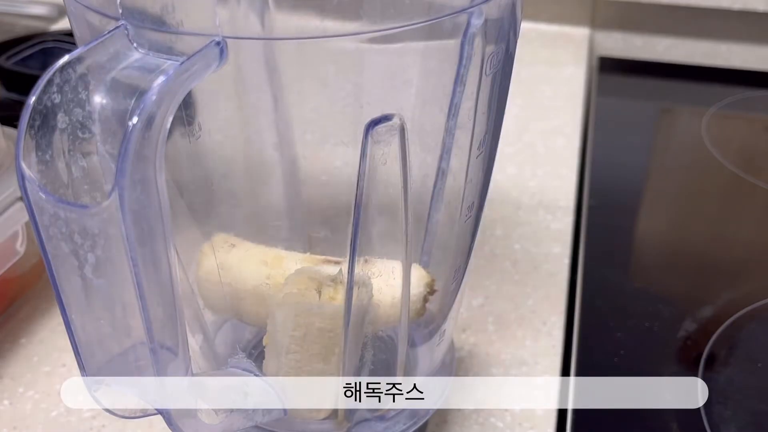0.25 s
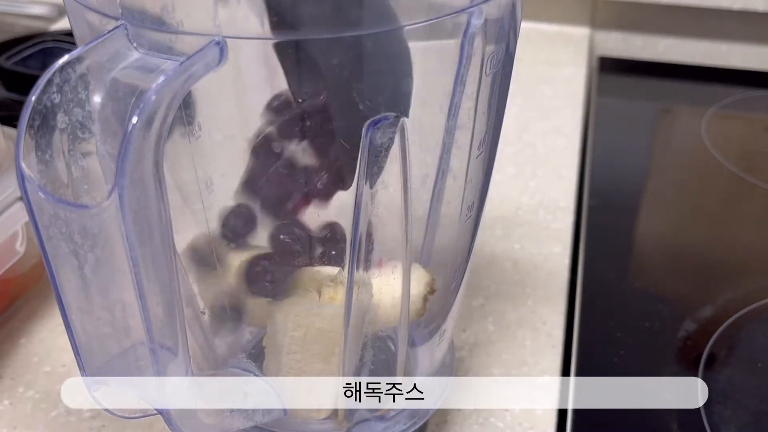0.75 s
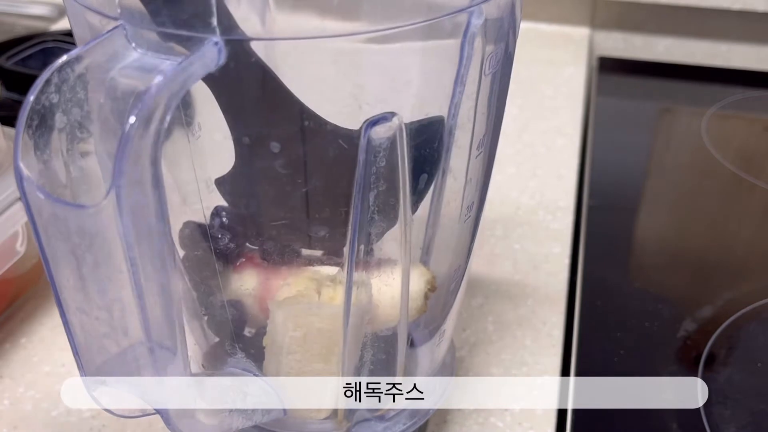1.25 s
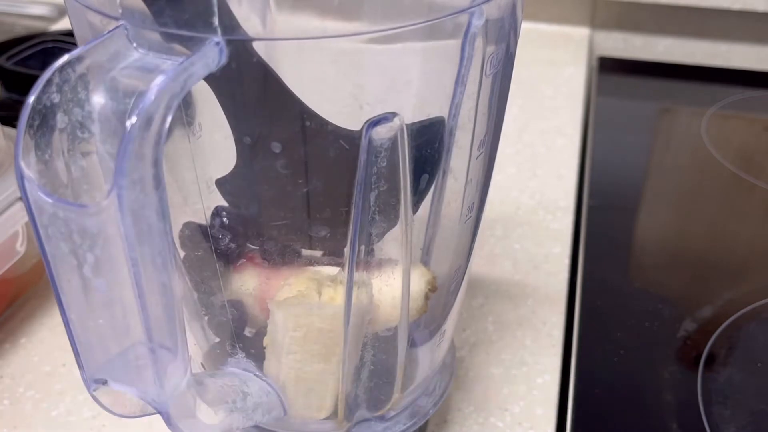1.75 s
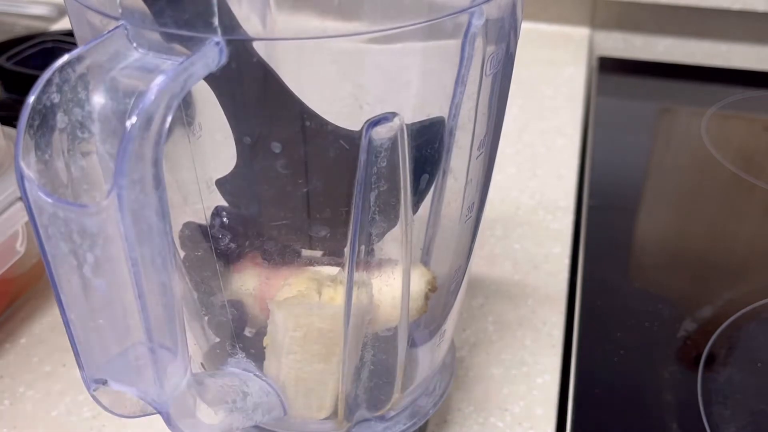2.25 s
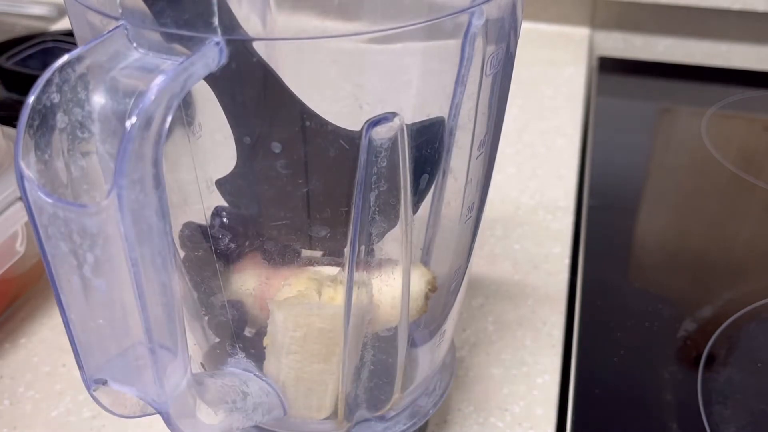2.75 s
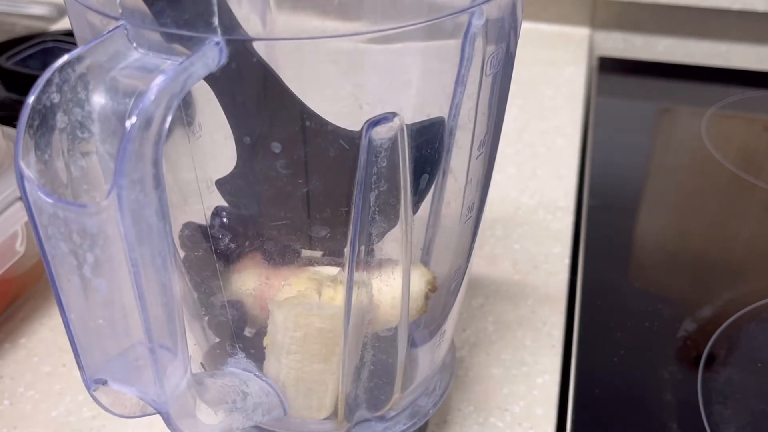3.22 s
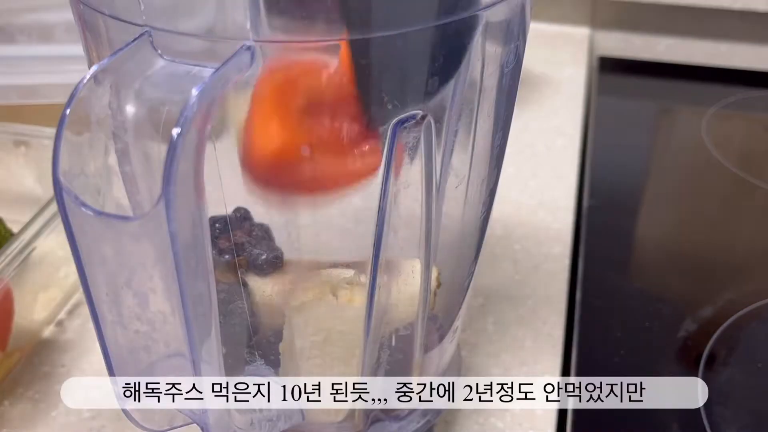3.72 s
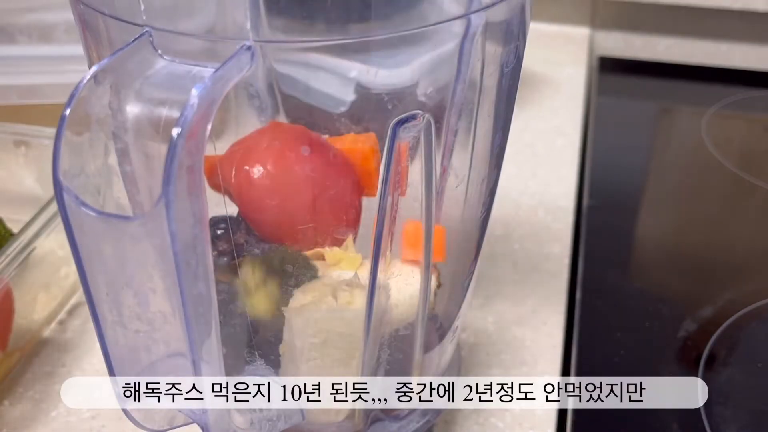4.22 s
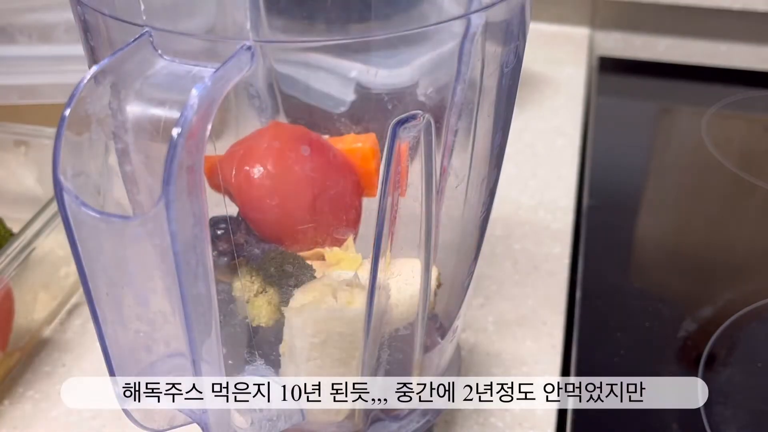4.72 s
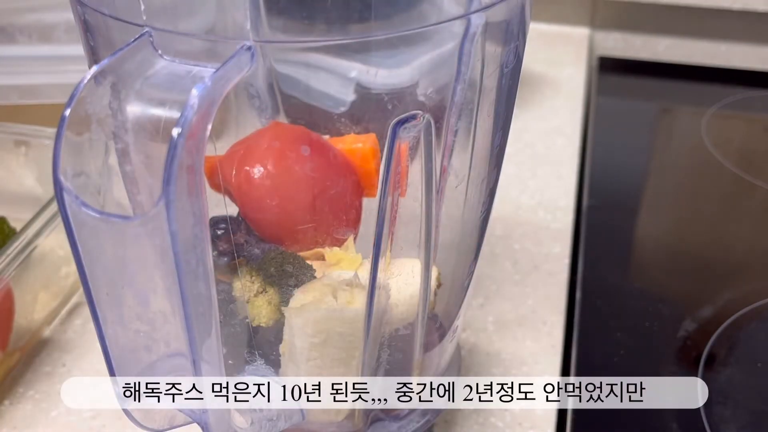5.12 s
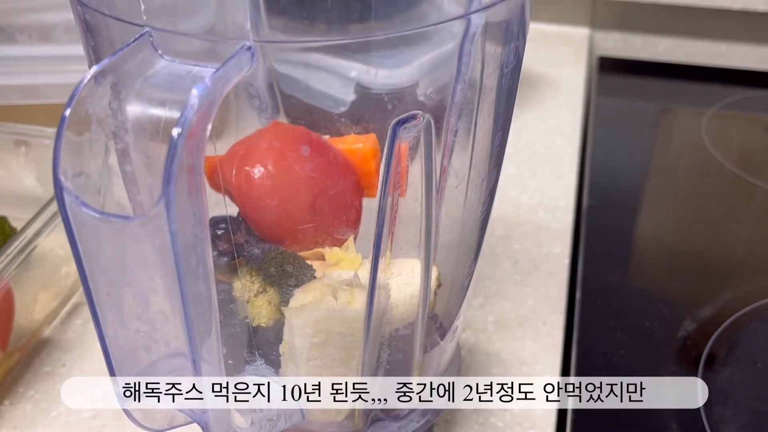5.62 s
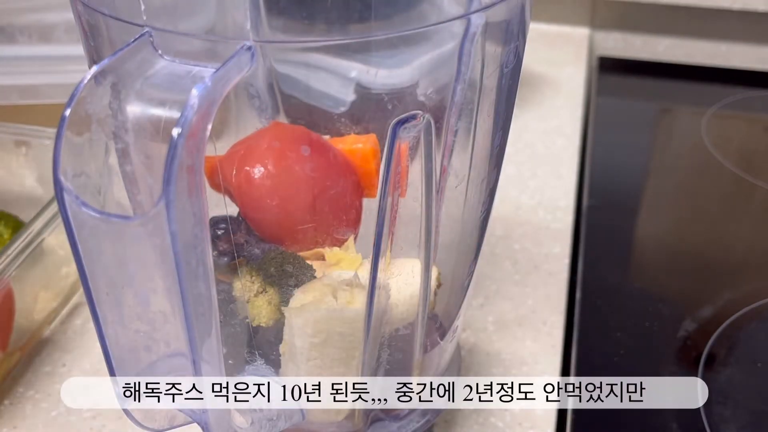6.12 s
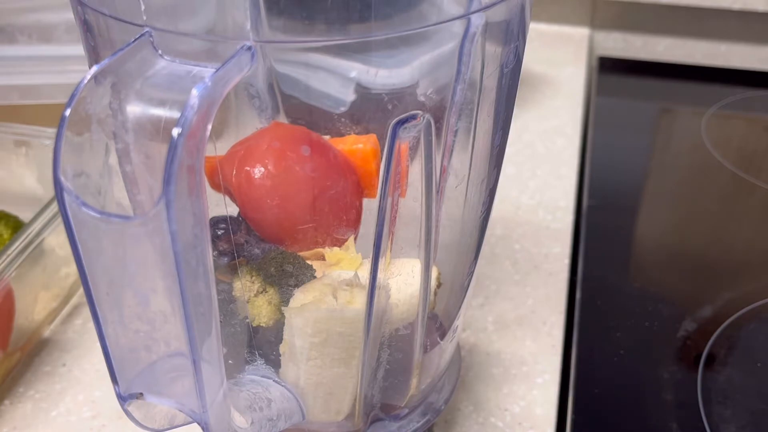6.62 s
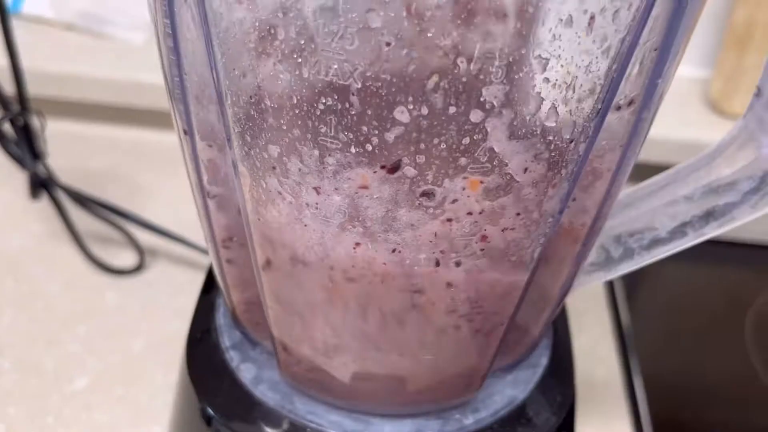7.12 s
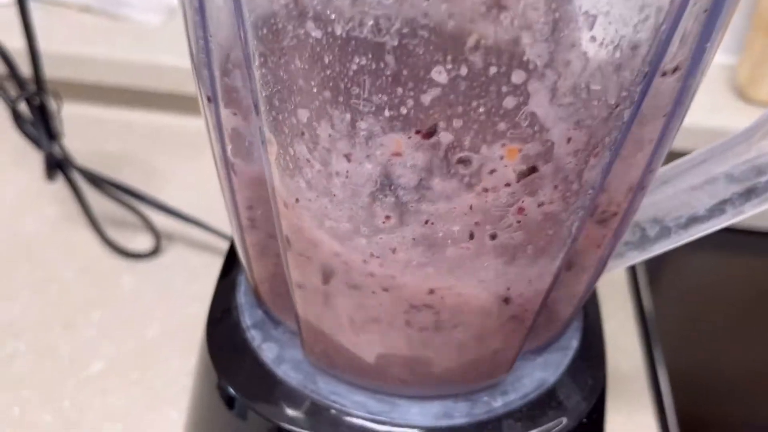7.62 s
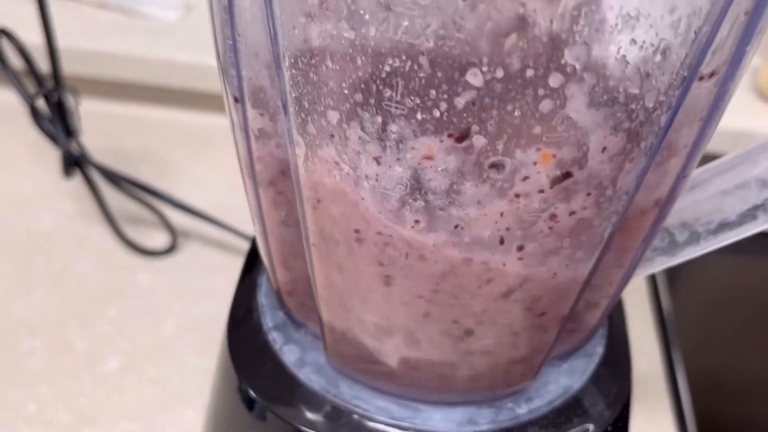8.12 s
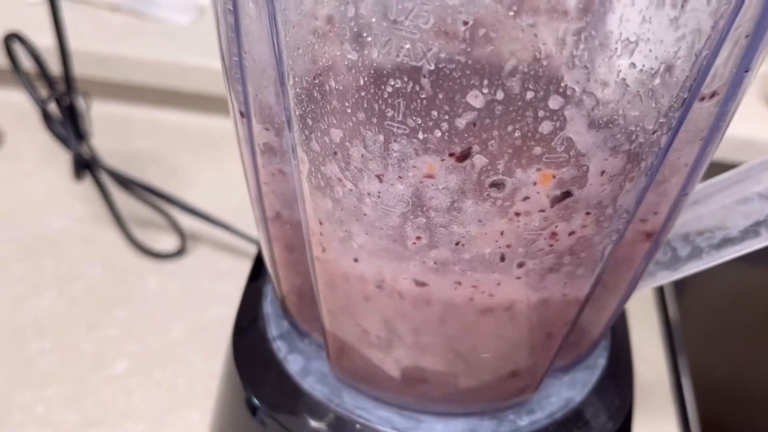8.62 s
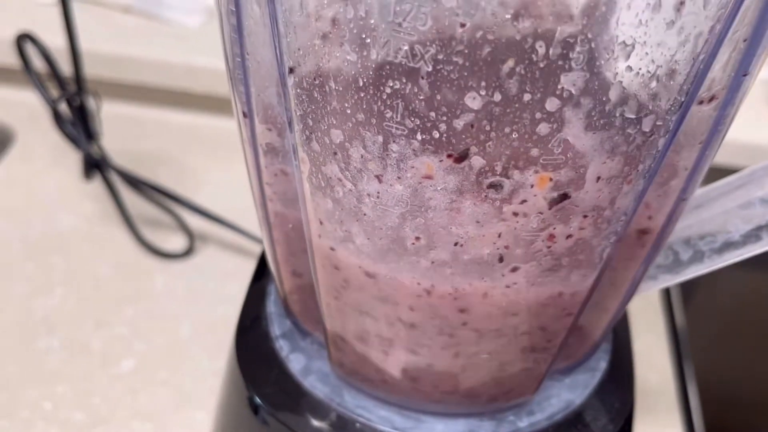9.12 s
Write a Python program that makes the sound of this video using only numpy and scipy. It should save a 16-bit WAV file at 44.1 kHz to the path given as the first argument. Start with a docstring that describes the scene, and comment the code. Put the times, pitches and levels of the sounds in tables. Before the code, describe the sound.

A low appliance hum runs under a close, slightly echoing kitchen scene. At about 0.6 seconds berries patter softly into a plastic blender jar, and just after 1 second a ladle clatters against its wall, followed by tiny drips. A dish clinks lightly near 1.9 seconds. A plastic tub knocks on the counter from 2.1 seconds, with a few wet plops, and its lid snaps sharply at 2.7. The jar rocks lightly around 3.2 seconds, and wet vegetables slide in from 3.6 to 4. Faint rubbing, drips and dull, more distant utensil taps fill the quiet stretch that follows. At 7.1 seconds a blender cuts in abruptly at full speed, far louder than everything else. Its motor drones with a wavering pitch while the blades churn pulp and air pockets glug. It squeals briefly near 8.7 seconds and is still running at the end, around 9.4 seconds.

```python
"""Making a smoothie

Berries tumble into a plastic blender jar and a ladle clatters in after them, ringing its wall.
A tub is set down, its lid snaps, wet vegetables slide in, juice drips and utensils tap.
Then the scene jumps to the blender at full speed: the motor sings, the blades churn the pulp
and air pockets glug. An appliance hums throughout. It is all heard through the two microphone
ports of a phone standing close by."""
import sys
import numpy as np
from scipy import signal
from scipy.fft import rfft, irfft, next_fast_len
from scipy.io import wavfile
from scipy.ndimage import uniform_filter1d, map_coordinates

SR = 44100
rng = np.random.default_rng(int(sys.argv[2]) if len(sys.argv) > 2 else 0)


def waveform_to_disk(signal):
    """Save audio, clipped to [-1, 1], as 16-bit WAV at the path in sys.argv[1]."""
    frames = np.transpose(np.atleast_2d(signal))
    scaled = np.clip(frames, -1, 1) * 32767
    samples = np.round(scaled).astype(np.int16)
    wavfile.write(sys.argv[1], SR, samples)


N = 412776

# The motor shaft. Each row: time in seconds, turns per second, level of its tones in dB.
SHAFT = [(7.4, 115.8, -32), (7.56, 119.6, -29), (7.84, 120.2, -35), (8.04, 116, -33), (8.5, 119.3, -36.5),
         (8.75, 122, -34), (8.95, 120, -32.5), (9.3, 119.3, -35.5)]
# The motor and blade tones. Each row: multiple of the shaft speed, relative level in dB.
SHAFT_TONES = [(2, -10), (3, -12), (4, -8), (5, -4), (6, -4), (7, -6), (8, -5), (9, -5), (10, -9),
               (18, -10), (23, -11), (38, -11)]
# The load on the blades. Each row: time in seconds, then relative dB of churning, gulping and spray.
BLADE_LOAD = [(7.14, -27, -34.5, -38), (7.24, -25, -29, -38.5), (7.34, -28.5, -33.5, -44),
              (7.38, -26.5, -33, -36.5), (7.47, -26, -29.5, -44.5), (7.56, -27, -35.5, -43.5),
              (7.63, -26, -27.5, -42.5), (7.68, -27, -30.5, -47), (7.87, -25.5, -29, -41.5),
              (7.95, -28.5, -35, -44), (7.97, -25.5, -36, -39), (8.02, -24.5, -28.5, -42.5),
              (8.09, -28.5, -34.5, -41.5), (8.13, -25.5, -33, -37), (8.23, -26.5, -28.5, -45),
              (8.28, -30, -35, -49.5), (8.3, -26, -28, -47.5), (8.35, -26.5, -31.5, -44.5),
              (8.47, -26, -32, -45.5), (8.51, -30.5, -36, -43.5), (8.59, -25.5, -27.5, -46.5),
              (8.67, -30.5, -34.5, -50), (8.73, -25, -35.5, -36), (8.79, -26.5, -24.5, -46),
              (8.83, -28, -22, -42.5), (8.86, -29.5, -36, -48.5), (8.91, -25.5, -29.5, -38),
              (8.97, -27, -24, -48), (9.02, -27.5, -38, -40.5), (9.04, -25.5, -31, -48),
              (9.16, -26, -27.5, -46), (9.28, -26, -31, -44.5), (9.31, -26.5, -35, -42),
              (9.34, -28, -32, -40.5)]
# The pitches of the housing's four strongest hums, in Hz.
DRONE_HZ = [237, 465, 718, 1258]
# How those hums come and go. Each row: time in seconds, then the relative dB of each hum.
DRONE_LEVELS = [(7.14, -36, -39, -39, -32), (7.35, -36.5, -30, -38, -34.5), (7.55, -38.5, -37, -38, -31.5),
                (7.8, -36, -45, -26, -32.5), (8.03, -35.5, -27, -34, -29), (8.17, -37, -44, -27.5, -28.5),
                (8.4, -39, -30, -48, -35), (8.7, -40, -46, -34, -35.5), (8.95, -35, -57, -33, -31),
                (9.17, -40.5, -26.5, -29, -32.5), (9.33, -40, -63, -35, -32.5)]
# A squealing bearing. Each row: time in seconds, pitch in Hz, level in dB.
SQUEAL = [(8.64, 3030, -58), (8.68, 3000, -25.5), (8.73, 3140, -31), (8.77, 3020, -70)]
# Air pockets collapsing in wet fruit and pulp. Each row: start in seconds, level in dB, pitch in Hz,
# fade time in seconds. A fade time (t60) is how long a sound takes to drop by 60 dB.
GLUGS = [(0.669, -39.5, 1900, 0.053), (0.721, -40.5, 1900, 0.063), (0.787, -46, 1940, 0.11),
         (0.801, -47, 1890, 0.068), (1.709, -51, 2070, 0.054), (1.728, -45.5, 2180, 0.082),
         (1.735, -49, 1900, 0.07), (1.785, -57, 2180, 0.11), (2.252, -25.5, 830, 0.033),
         (2.296, -33.5, 966, 0.057), (2.413, -29, 868, 0.043), (3.74, -43, 2090, 0.023),
         (3.752, -42, 2650, 0.023), (3.822, -55, 4900, 0.014), (3.87, -46, 4600, 0.019),
         (3.871, -44, 1090, .035), (3.881, -45, 4670, 0.015), (3.94, -49, 706, 0.044),
         (4.006, -44, 600, 0.076), (4.427, -50.5, 3200, 0.024), (4.428, -52, 1950, 0.078),
         (7.211, -24.5, 806, 0.1), (7.265, -25, 223, 0.24), (7.41, -23, 457, 0.15),
         (7.478, -28, 380, 0.061), (7.64, -30, 467, .09), (7.767, -17, 322, 0.066),
         (7.841, -20.5, 764, 0.067), (8.006, -18.5, 458, 0.22), (8.21, -19.5, 438, .08),
         (8.238, -20, 353, 0.062), (8.25, -20, 227, 0.083), (8.295, -21, 404, 0.085),
         (8.404, -13.5, 785, 0.051), (8.46, -21.5, 460, 0.11), (8.581, -23.5, 342, 0.11),
         (8.73, -24, 520, 0.16), (8.789, -17, 238, 0.11), (8.88, -26, 191, 0.084), (8.89, -20, 547, 0.1),
         (8.969, -17, 209, 0.075), (8.99, -19, 344, 0.044), (9.1, -24, 413, 0.18), (9.22, -21, 430, 0.074)]

# Hits. Each row: start in seconds, sharp strike in dB, low knock in dB, contact fade time in seconds.
LADLE_HITS = [(1.062, -39, -49, 0.026), (1.086, -34.5, -34.5, 0.048), (1.115, -24, -34, 0.047),
              (1.126, -33, -41, .04), (1.139, -27.5, -43, 0.025), (1.147, -27.5, -30.5, 0.049),
              (1.162, -37.5, -38, .04), (1.173, -30, -30.5, 0.04), (1.19, -41.5, -38, .05),
              (1.217, -45, -35, 0.058)]  # the ladle clatters to rest in the jar
DISH_HITS = [(1.902, -34, -44.5, 0.061)]  # a dish is nudged
TUB_HITS = [(2.061, -28.5, -47.5, 0.079), (2.081, -27, -33, 0.054), (2.095, -45.5, -23.5, 0.032),
            (2.131, -26.5, -42, 0.054), (2.142, -22.5, -13.5, 0.05), (2.25, -50, -44.5, 0.053),
            (2.298, -57.5, -45.5, 0.068), (2.413, -46.5, -43, 0.06), (2.44, -51.5, -50.5, .05),
            (2.467, -48, -43.5, 0.069), (2.544, -37.5, -29, 0.039), (2.562, -35, -26.5, 0.07),
            (2.602, -44, -40, 0.056), (2.647, -42, -39, 0.17)]  # the tub knocks on the counter
LID_HITS = [(2.689, -18, -30, 0.015)]  # its lid snaps
JAR_HITS = [(3.095, -38.5, -29.5, 0.022), (3.206, -39, -33, .03), (3.228, -49, -39, .04),
            (3.265, -55.5, -38.5, 0.05), (3.291, -56, -40, .04), (3.312, -62, -50, .04),
            (3.334, -65, -45, 0.036), (3.379, -56, -62, .008)]  # the jar rocks on its base
# Lighter hits. Each row: start in seconds, sharp strike in dB, low knock in dB.
BERRY_HITS = [(0.612, -55.5, -48.5), (0.664, -57.5, -46.5), (0.721, -53.5, -54), (0.74, -53, -45.5),
              (0.764, -61.5, -51.5), (0.803, -53.5, -40.5), (0.827, -60.5, -48), (0.934, -58, -48),
              (3.869, -64.5, -52.5)]  # berries and vegetable pieces land in the jar
BOARD_TAPS = [(4.751, -58, -44.5), (5.127, -46, -40), (5.301, -85.5, -52.5), (5.463, -48.5, -41),
              (5.5, -52, -43), (6.799, -69, -68.5), (6.864, -62.5, -49.5), (7.013, -60.5, -46)]  # utensils tap farther off
# Food and fingers sliding on plastic. Each row: start, rise time and fade time in seconds,
# then rub and hiss levels in dB.
SLIDES = [(0.525, 0.022, 0.086, -71, -58.5), (0.62, 0.14, 0.44, -63.5, -66), (1.671, 0.039, 1, -64.5, -60),
          (3.61, 0.051, 0.64, -43, -61.5), (3.735, 0.025, 0.1, -56.5, -61), (3.85, 0.02, 0.82, -74, -63.5),
          (4.22, 0.0151, .7, -79, -70), (5.03, 0.0397, 0.34, -80.5, -64), (5.32, .06, .4, -74, -67.5),
          (5.65, 0.07, .6, -73, -74.5), (6.17, 0.028, 0.36, -77, -66), (6.265, .02, 0.35, -74, -69),
          (6.49, 0.0298, 0.24, -79, -65.5), (6.75, 0.0305, 0.29, -70, -70.5)]
# Juice dripping from the ladle. Each row: start in seconds, level in dB.
DRIPS = [(1.268, -58), (1.339, -58.5), (1.396, -60), (1.438, -62.5), (3.87, -69.5), (4.426, -57.5),
         (5.812, -71), (6.797, -69)]

# Modes are the notes a thing rings at. Each row: pitch in Hz, width in Hz, relative level in dB.
# A narrower mode rings for longer.
HOUSING_MODES = [(236, 16, -2), (464, 16, -1), (718, 14, 0), (1225, 25, 2), (1262, 30, 3), (1305, 25, 1),
                 (1450, 14, 5), (1755, 14, 6), (1900, 60, 2), (2160, 25, 4), (2720, 120, -3), (3278, 30, 1),
                 (4470, 120, 4.5), (5680, 250, 3)]
JAR_WALL_MODES = [(1050, 70, -7), (1420, 51, -5), (1920, 36, 3), (1965, 64, 7.5), (2110, 38, 3.5),
                  (2566, 200, -5), (3000, 43, -2), (3470, 65, -3), (4120, 85, -8), (5130, 220, -5)]
JAR_BODY_MODES = [(163.3, 58, 7), (239.5, 19.3, -10.5), (437, 42, 4.5), (591, 95, 1)]
BASE_MODES = [(174, 30, -6.5), (205, 27.3, -1.5), (259, 29, -14.5), (319.6, 70, 2), (420, 49, -5.5),
              (530, 51, -4)]
PLASTIC_MODES = [(675, 51, -16), (1128, 16, -5), (1726, 35, -2), (1996, 30, -2), (2076, 20, 7),
                 (2195, 30, -1), (2406, 45, -3), (2700, 45, -1), (3328, 45, 5), (3531, 60, -1),
                 (4250, 60, -4), (4645, 90, 0), (5440, 90, -4)]  # for the tub and the rocking jar
TUB_BODY_MODES = [(192, 38, -13), (330, 52, -3), (370, 36, 0), (425, 38, -5), (547, 30, -20)]
LID_MODES = [(1195, 14, 9), (1355, 50, -0.5), (1850, 40, 1.5), (2060, 50, 6), (2530, 63, 7.5),
             (2710, 37, 8.5), (3250, 26, -3.5), (4220, 90, 5.5), (4500, 90, 4), (5060, 60, -1),
             (6433, 80, -2)]
DISH_MODES = [(654, 19, 14.5), (1155, 13, 4.5), (1467, 16, 5), (1740, 12, -3), (2004, 14, -2),
              (2300, 90, -4.5), (3540, 40, -11), (4790, 30, -9.5), (5590, 30.2, -17.5)]
COUNTER_MODES = [(208, 50, -7.5), (323, 70, -8), (358, 130, 1), (426.6, 150, -3.5), (534, 40, -15),
                 (915, 130, -7)]
BOARD_MODES = [(351, 55, 0.5), (563, 82, -4), (854, 280, -12.5), (1634, 130, -9.5), (2250, 110, -29)]
WHISTLE_MODES = [(2852, 45, 2), (6630, 140, -2.5)]

# The tone colour of each noise, from bass to treble. Each row: frequency in Hz, relative level in dB.
CHURN_COLOUR = [(450, -2.5), (660, -1), (800, 0), (1100, -3), (1500, -1), (2000, -7.5), (2900, -4),
                (3800, -9), (5600, -13.5), (7000, -16.5), (8500, -22.5), (11000, -23.5), (13000, -34.5),
                (15500, -33)]
CHURN_HOLLOWS = [(600, 0), (665, -6), (720, 0), (1280, 0), (1355, -5), (1420, 0), (1980, 1), (2050, -3),
                 (2140, 1), (2230, -3), (2320, 1), (2470, -2), (2600, 0), (3300, 0), (3450, -3), (3950, 1),
                 (4170, -4), (4450, 1), (4750, 1), (4930, -5), (5260, 1), (5400, -2.5), (5650, 1),
                 (5980, -2), (6280, 2), (6500, -1)]  # narrow dips and peaks that make the churning sound hollow
GULP_COLOUR = [(40, -36), (100, -10.5), (160, -11), (210, -2.5), (285, -17), (360, -2), (450, -5.5),
               (650, -12.5), (1500, -51.5)]
JAR_CRACK = [(800, -4.5), (1050, -5.5), (1500, -5.5), (2050, 1), (2800, -6.5), (4500, -9), (6500, -20.5),
             (8500, -14), (11000, -27.5), (15000, -48.5)]
HARD_CRACK = [(800, 3), (1200, 2), (1700, 10), (2200, 1.5), (3300, -5.5), (4700, -11), (6500, -10),
              (8500, -6), (11000, -17), (15000, -34.5)]  # for the tub, the dish and the rocking jar
LID_CRACK = [(800, -8), (1200, 1.5), (1700, -0.5), (2650, 2.5), (3600, -12), (4300, -3.5), (6000, -9),
             (8500, -6), (11000, -6.5), (15000, -21.5)]
TAP_CRACK = [(500, -17), (1000, 3), (1700, -6), (2300, 0), (3200, -10), (4500, -14), (7000, -53),
             (15000, -48.5)]
RUB_COLOUR = [(300, -4), (600, -2), (1300, -2), (2200, -5), (3000, -7), (4000, -15), (8000, -32)]
HISS_COLOUR = [(1500, -36), (3300, -8), (4600, -3.5), (6500, -2.5), (11000, -5.5), (15000, -21)]
DRIP_COLOUR = [(1000, -16.5), (2000, -8.5), (3000, 3.5), (3800, -8), (4700, -10), (7000, -23.5),
               (15000, -27.5)]
AIR_COLOUR = [(20, -14.5), (35, -3.5), (60, 9.5), (130, -10.5), (220, -1.5), (350, -15), (700, -16),
              (1500, -26), (2500, -39.5), (4500, -46.5), (8000, -41.5), (11000, -39.5), (15500, -36.5)]

# The appliance's hum before the blender comes in. Each row: pitch in Hz, level in dB.
HUM_TONES = [(90.9, -46), (179.8, -49.5), (120, -61.5), (307, -65)]
# The kitchen's echo. Each row: frequency in Hz, fade time in seconds.
ECHO_FADE = [(100, .4), (400, 0.72), (1500, 0.56), (4500, 0.38), (12000, 0.31)]
# How alike left and right are. Each row: frequency in Hz, likeness (1 means the same).
STEREO_LIKENESS = [(200, 0.97), (400, 0.56), (900, 0.078), (1600, 0.42), (2200, 0.99), (4000, 1), (7000, 1),
                   (14000, 1)]
# Timing between the microphone ports. Each row: frequency in Hz, the left one's lead in cycles.
PORT_LEAD = [(1320, 0), (1570, -.5), (1780, -1), (5100, -1), (6600, -1.13), (8000, -1.47), (8900, -1.52),
             (11200, -2), (13000, -2), (14700, -2.47), (16000, -2.5)]
# Balance between the ports. Each row: frequency in Hz, left level minus right level in dB.
PORT_BALANCE = [(100, 0), (330, 3), (560, 1), (800, 3.5), (1250, 0), (1650, -7), (2500, 1.5), (3500, 0.5)]

BLENDER_START_S = 7.12
FIRM_DB, FIRM_CORNER_HZ = -25, 26000  # a firm hit's level, and where its treble falls off
RING_GROWTH, TICK_GROWTH, THUD_GROWTH = 1.96, 1, 0.15  # dB gained for each dB of a harder hit
CEILING, TOP_HZ = 0.85, 15900  # where peaks are rounded off; the highest frequency let through


def blender():
    """The motor sings while the blades chop pulp, shake the housing, gulp air and fling spray."""
    speed, tones_db = curves(SHAFT)
    churn_db, gulp_db, spray_db = curves(BLADE_LOAD)
    slosh = wobble(30)  # the pulp lurches at random
    # lumps make the shaft's speed unsteady
    angle = 2 * np.pi * np.cumsum(speed * (1 + 0.009 * wobble(35))) / SR
    tones = amp(tones_db) * shaft_tones(angle)
    blade_pulse = 1 + 0.088 * np.cos(2 * angle) + 0.034 * np.cos(angle)
    chopping = unit(blade_pulse * amp(1.2 * wobble(300)))
    pulp = lambda f: amp(along(CHURN_COLOUR, f) + along(CHURN_HOLLOWS, f)) * above(f, 373)
    churn = chopping * noise(pulp, patchy_db=1.5)
    housing = noise(lambda f: resonant(HOUSING_MODES, f) * colour(CHURN_COLOUR, f), patchy_db=3.5)
    # about 400 seeds and hard bits strike the jar each second
    strikes = (rng.random(N) < 400 / SR) * rng.standard_normal(N)
    seeds = unit(filtered(strikes, lambda f: causal(pulp(f))))
    motor = amp(-31) * housing + tones + housing_drone()
    churning = amp(churn_db + 0.5 * slosh) * (amp(1.25) * churn + amp(-9.5) * seeds)
    gulp_gain = amp(gulp_db - 6 + 1.5 * slosh + 2.1 * wobble(35))
    gulp = gulp_gain * noise(lambda f: colour(GULP_COLOUR, f), patchy_db=0.5)
    spray_hiss = noise(lambda f: above(f, 9800) * (1 - above(f, 9600)), patchy_db=0.5)
    spray = amp(spray_db + 2.5) * chopping * spray_hiss
    running = np.arange(N) >= BLENDER_START_S * SR
    return running * (motor + churning + gulp + spray + bearing_squeal())


def shaft_tones(angle):
    """Motor and blades sing at multiples of the shaft speed, each tone roughened by lumps."""
    tones = 0
    for multiple, db in SHAFT_TONES:
        gain = amp(db + 3.6 * wobble(12))
        tones += gain * np.sin(multiple * angle + 0.44 * wobble(70) + rng.uniform(0, 2 * np.pi))
    return unit(tones)


def housing_drone():
    """The housing's strongest hums waver in pitch and take turns to swell."""
    hums = 0
    for hz, level_db in zip(DRONE_HZ, curves(DRONE_LEVELS)):
        phase = 2 * np.pi * np.cumsum(hz * (1 + 0.011 * wobble(60))) / SR
        hums += amp(level_db + 2.5 * wobble(40)) * np.sin(phase + 0.4 * wobble(90))
    return amp(-2) * hums


def bearing_squeal():
    """A bearing sings out briefly under the load."""
    hz, level_db = curves(SQUEAL)
    t = np.arange(N) / SR
    singing = (t > SQUEAL[0][0]) & (t < SQUEAL[-1][0])
    phase = 2 * np.pi * np.cumsum(hz * (1 + 0.0049 * wobble(200))) / SR
    return singing * amp(level_db) * np.sin(phase)


def glugs(gurgles_per_s=22, middle_hz=482.3):
    """Big air pockets glug and tiny ones tick; many more gurgle in the whirling pulp."""
    track = np.zeros((2, N))
    for start, db, hz, t60 in GLUGS:
        add(track, start, in_kitchen(amp(db) * air_pocket(hz, t60), wet_db=-13))
    running_s = N / SR - BLENDER_START_S
    for when, size, pitch in rng.random((int(gurgles_per_s * running_s), 3)):
        hz = middle_hz * 2 ** (2 * pitch - 1)  # up to an octave either way
        gurgle = amp(-45 + 10 * size) * air_pocket(hz, t60=0.06)
        add(track, BLENDER_START_S + when * running_s, gurgle)
    return track


def air_pocket(hz, t60):
    """An air pocket swells softly and rings, its pitch rising 16 percent as it dies away."""
    t = np.arange(SR // 5) / SR
    ring = np.sin(2 * np.pi * hz * (t + 0.16 * t ** 2 / (2 * t60)))
    swell = 1 - np.exp(-t * hz / 1.6)
    return ring * swell * amp(-60 * t / t60)


def handling():
    """Fruit and ladle land in the jar; dish, tub, lid and jar are knocked as they are handled."""
    drops = [(start, strike, knock, 0.053) for start, strike, knock in BERRY_HITS]  # add a fade time
    berries = hits(drops, JAR_WALL_MODES, JAR_BODY_MODES, JAR_CRACK, softness=0.024, dulling=0.05,
                   detune=0.022, ring_db=-2, tick_db=-30, thud_db=-45, wet_db=-5)
    ladle = hits(LADLE_HITS, JAR_WALL_MODES, JAR_BODY_MODES, JAR_CRACK, softness=0.061, dulling=0.08,
                 detune=0.026, ring_db=-24.5, tick_db=-35.5, thud_db=-38.5, wet_db=-15)
    tub = hits(TUB_HITS, PLASTIC_MODES, TUB_BODY_MODES, HARD_CRACK, softness=0.055, dulling=0.55,
               detune=0.02, ring_db=-24, tick_db=-37, thud_db=-41, wet_db=-15)
    lid = hits(LID_HITS, LID_MODES, COUNTER_MODES, LID_CRACK, softness=0.092, dulling=0.05,
               detune=0.02, ring_db=-33, tick_db=-31.5, thud_db=-41.5, wet_db=-7.5)
    jar = hits(JAR_HITS, PLASTIC_MODES, BASE_MODES, HARD_CRACK, softness=0.081, dulling=0.2,
               detune=0.04, ring_db=-22.5, tick_db=-39.5, thud_db=-41, wet_db=-6.5)
    dish = hits(DISH_HITS, DISH_MODES, COUNTER_MODES, HARD_CRACK, softness=0.036, dulling=0.05,
                detune=0.04, ring_db=-17, tick_db=-30, thud_db=-54.5, wet_db=-9.5)
    return berries + ladle + dish + tub + lid + jar


def hits(rows, wall, body, crack, softness, dulling, detune, ring_db, tick_db, thud_db, wet_db):
    """Each hit cracks, ticks, rings the wall, knocks the body under it and thuds the counter."""
    track = np.zeros((2, N))
    for start, strike_db, knock_db, t60 in rows:
        force_db, weight_db = strike_db - FIRM_DB, knock_db - FIRM_DB
        rise_s = softness * max(t60, 0.004)  # a long, scuffing contact also starts slowly
        # each hit lands somewhere new, so the wall rings a little differently
        modes = [(hz, width, db + rng.normal(0, 1)) for hz, width, db in wall]
        ring = contact(lambda f: resonant(modes, f), t60, rise_s)
        clack = contact(lambda f: causal(colour(crack, f) * above(f, 500)), t60, rise_s)
        tick = contact(lambda f: causal(above(f, 5900)), t60 / 2, rise_s / 2)
        sound = amp(ring_db + RING_GROWTH * force_db) * ring + amp(strike_db) * clack
        sound += amp(tick_db + TICK_GROWTH * force_db) * tick
        corner_hz = FIRM_CORNER_HZ * amp(dulling * force_db)  # lighter hits are duller
        sound = filtered(sound, lambda f: causal(1 / (1 + (f / corner_hz) ** 2)))
        sound += amp(knock_db) * low_knock(body, detune)
        thud = low_knock([(61.3, 13, -1), (101, 14, 0)], detune)  # the counter's deepest modes
        sound += amp(thud_db + THUD_GROWTH * weight_db) * thud
        add(track, start, in_kitchen(sound, wet_db))
    return track


def contact(response, t60, rise_s):
    """Two things chatter briefly as they meet: a burst of noise, coloured by the thing struck."""
    t = np.arange(SR // 3) / SR
    force = rng.standard_normal(len(t)) * amp(-60 * t / max(t60, 0.004)) * (1 - np.exp(-t / rise_s))
    return unit_start(filtered(force, response))


def low_knock(modes, detune):
    """One clean push rings a body's low modes, at slightly different pitches and levels each time."""
    t = np.arange(SR // 3) / SR
    ring = 0
    for hz, width, db in modes:
        gain = amp(db + rng.normal(0, 2))
        pitch = hz * rng.normal(1, detune)
        ring += gain * np.sin(2 * np.pi * pitch * t) * np.exp(-np.pi * width * t)
    return unit_start(ring * (1 - np.exp(-t / 0.016)))


def utensil_taps():
    """Utensils tap dully on a board, with plenty of the room's echo."""
    track = np.zeros((2, N))
    for start, clack_db, knock_db in BOARD_TAPS:
        clack = contact(lambda f: causal(colour(TAP_CRACK, f) * above(f, 460)), t60=0.03, rise_s=0.0017)
        knock = contact(lambda f: resonant(BOARD_MODES, f), t60=0.12, rise_s=0.0016)
        add(track, start, in_kitchen(amp(clack_db) * clack + amp(knock_db) * knock, wet_db=-7.5))
    return track


def sliding_food():
    """Wet food and fingers catch and slip on plastic; each stroke swells, then dies away."""
    t = np.arange(N) / SR
    rub = noise(lambda f: colour(RUB_COLOUR, f), patchy_db=2.5)
    hiss = noise(lambda f: colour(HISS_COLOUR, f), patchy_db=2.5)
    track = np.zeros((2, N))
    for start, rise_s, t60, rub_db, hiss_db in SLIDES:
        swell = np.clip((t - start) / rise_s, 0, 1) ** 2
        fade = amp(-60 * np.maximum(t - start - rise_s, 0) / t60)
        track += swell * fade * (amp(rub_db) * rub + amp(hiss_db) * hiss)
    return track * amp(0.97 * wobble(120))


def juice_drips():
    """Drops of juice tick on the plastic."""
    track = np.zeros((2, N))
    for start, db in DRIPS:
        tick = contact(lambda f: causal(colour(DRIP_COLOUR, f) * above(f, 800)), t60=0.025, rise_s=0.001)
        add(track, start, in_kitchen(amp(db) * tick, wet_db=-8))
    return track


def appliance_and_air():
    """An appliance hums and whistles over the room's air; all are fainter in the blender scene."""
    t = np.arange(N) / SR
    hum = 0
    for hz, db in HUM_TONES:
        hum += amp(db + 0.92 * wobble(9.2)) * np.sin(2 * np.pi * hz * t + 0.43 * wobble(2))
    air = amp(-47.5) * noise(lambda f: colour(AIR_COLOUR, f), patchy_db=1)
    whistle = amp(-77) * noise(lambda f: resonant(WHISTLE_MODES, f), patchy_db=1)
    return (hum + air + whistle) * np.where(t < BLENDER_START_S, 1, amp(-6.5))


def in_kitchen(sound, wet_db):
    """A sound plus its echo from the tiled walls; wet_db sets how strong the echo is."""
    hz, t, bands = signal.stft(rng.standard_normal((2, SR // 2)), SR, nperseg=256)
    fade = amp(-60 * t / along(ECHO_FADE, hz)[:, None])
    swell = 1 - np.exp(-t / 0.0077)
    tail = spread(signal.istft(bands * fade * swell, SR, nperseg=256)[1])
    tail = amp(wet_db) * tail / np.linalg.norm(tail[0])
    heard = signal.fftconvolve(radiated(sound)[None], tail, axes=1)
    add(heard, 0, sound)
    return heard


def radiated(sound):
    """The walls get sound sent in all directions, which smooths out the dips in its tone colour."""
    energy = np.cumsum(np.abs(rfft(sound)) ** 2)
    bins = np.arange(len(energy))
    low = (bins / 1.1).astype(int)
    high = np.minimum((bins * 1.1).astype(int) + 1, bins[-1])
    return irfft(causal(np.sqrt((energy[high] - energy[low]) / (high - low))))


def hollow_pickup(sound):
    """The phone's stereo pickup smears one narrow band into a hollow note, mostly on the right."""
    note = lambda f: np.exp(-((f - 1690) / 65) ** 2 + 2j * np.pi * f * 0.01)
    return sound + amp([[-18], [-2]]) * filtered(sound, note)


def noise(response, patchy_db):
    """Filtered stereo noise of strength 1, with random louder and softer patches."""
    bands = signal.stft(rng.standard_normal((2, N)), nperseg=512)[2]
    patches = uniform_filter1d(rng.standard_normal(bands.shape[1:]), size=7, axis=0)
    patches = uniform_filter1d(patches, size=8, axis=1)
    pair = signal.istft(bands * amp(patchy_db * unit(patches)), nperseg=512)[1][:, :N]
    return unit(filtered(spread(pair), response))


def spread(pair):
    """Blend two unrelated signals into left and right, as the ports hear sound from all around."""
    angle = lambda f: np.arccos(np.clip(along(STEREO_LIKENESS, f), -1, 1)) / 2
    mid, side = filtered(pair, lambda f: np.array([np.cos(angle(f)), np.sin(angle(f))]))
    return np.array([mid + side, mid - side])


def filtered(x, response):
    """Filter x; response(f) gives the gain and phase at each frequency f."""
    n = x.shape[-1]
    padded = next_fast_len(n + 8192)
    return irfft(rfft(x, padded) * response(np.fft.rfftfreq(padded, 1 / SR)), padded)[..., :n]


def resonant(modes, f):
    """The response of a thing that rings at these modes."""
    return sum((-1) ** k * amp(db) * 1j * f * width / (hz * hz - f * f + 1j * f * width)
               for k, (hz, width, db) in enumerate(modes))


def causal(gain):
    """A response with this gain that never rings before it is struck (minimum phase)."""
    cepstrum = irfft(np.log(np.maximum(gain, 1e-6)))
    half = len(cepstrum) // 2
    cepstrum[1:half] *= 2
    cepstrum[half + 1:] = 0
    return np.exp(rfft(cepstrum))


def above(f, edge_hz):
    """A gain that steeply cuts what lies below edge_hz."""
    return f ** 4 / (f ** 4 + edge_hz ** 4)


def colour(points, f):
    """The gain of a tone colour table at frequencies f."""
    return amp(along(points, f))


def along(points, hz):
    """Read between the rows of a frequency table, with octaves evenly spaced."""
    f, values = np.transpose(points)
    return np.interp(np.log(hz + 1), np.log(f + 1), values)


def curves(rows):
    """Turn each column after the time into one value per sample."""
    times, *columns = np.transpose(rows)
    return [np.interp(np.arange(N) / SR, times, column) for column in columns]


def wobble(rate):
    """A smooth curve through this many random values a second."""
    return map_coordinates(rng.standard_normal(int(N * rate / SR) + 4), [np.arange(N) * rate / SR])


def amp(db):
    """Turn decibels into a gain."""
    return 10 ** (np.asarray(db) / 20)


def unit(x):
    """Scale to an average strength (rms) of 1."""
    return x / np.sqrt(np.mean(x ** 2) + 1e-20)


def unit_start(x):
    """Scale so that the first 20 ms have strength 1."""
    return x / np.sqrt(np.mean(x[:SR // 50] ** 2))


def add(track, start_s, sound):
    """Mix a sound into a track."""
    part = track[..., round(start_s * SR):][..., :sound.shape[-1]]
    part += sound[..., :part.shape[-1]]


def scene():
    """Everything that sounds in the kitchen."""
    knocks = hollow_pickup(handling() + utensil_taps())
    return knocks + juice_drips() + sliding_food() + blender() + glugs() + appliance_and_air()


def record(dry):
    """The phone's ports differ in timing and level; it rounds off peaks and drops the top treble."""
    sides = np.array([[1], [-1]])
    timing = lambda f: np.exp(1j * np.pi * sides * along(PORT_LEAD, f))
    balance = lambda f: amp(sides * along(PORT_BALANCE, f) / 2)
    heard = filtered(dry, lambda f: timing(f) * balance(f))
    rounded = heard / (1 + (heard / CEILING) ** 6) ** (1 / 6)
    return filtered(rounded, lambda f: f < TOP_HZ)


dry = scene()
out = record(dry)
waveform_to_disk(out)
```